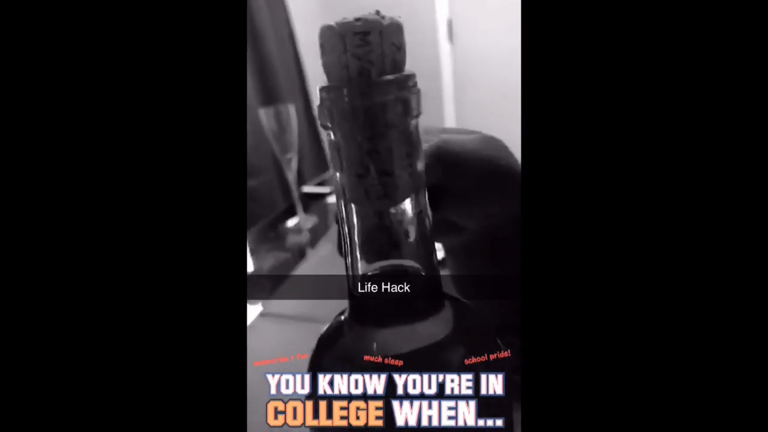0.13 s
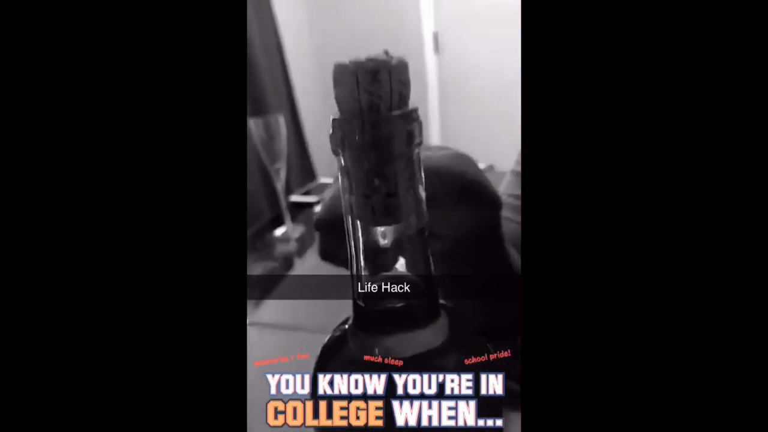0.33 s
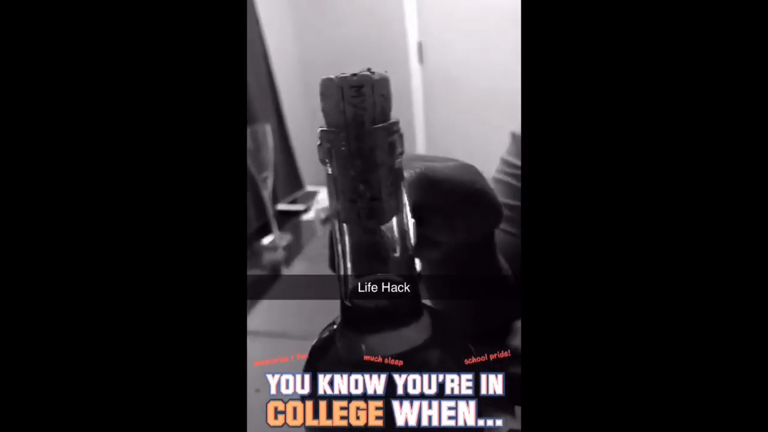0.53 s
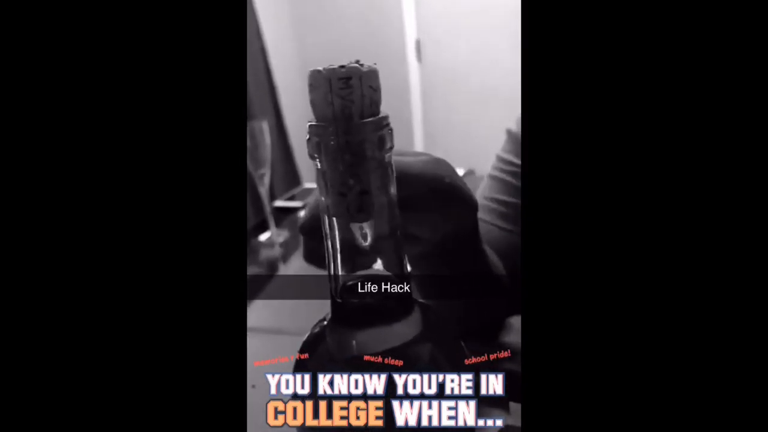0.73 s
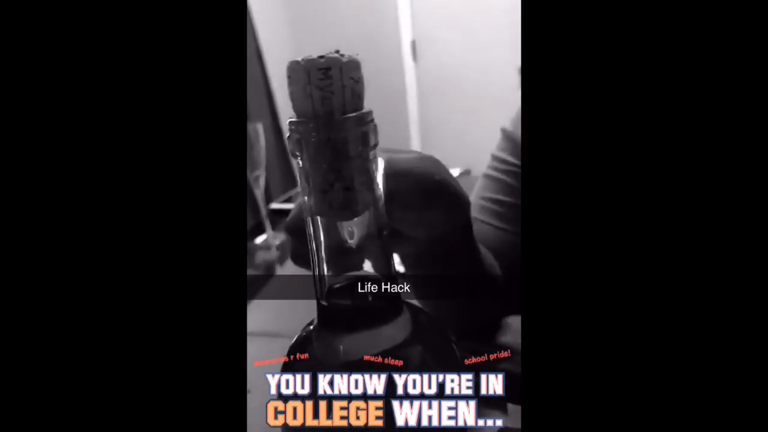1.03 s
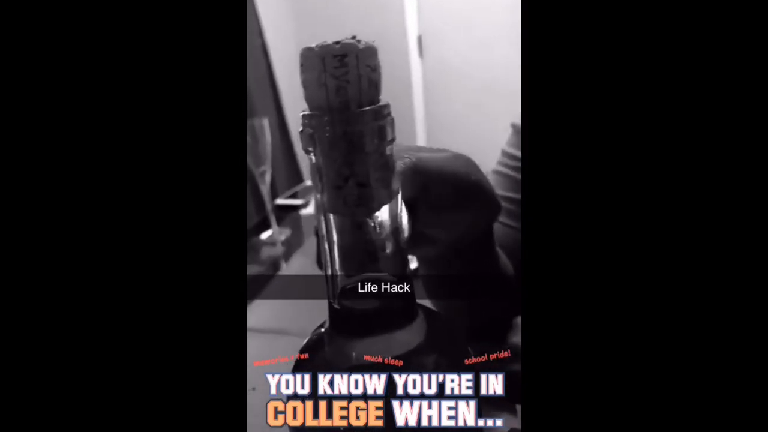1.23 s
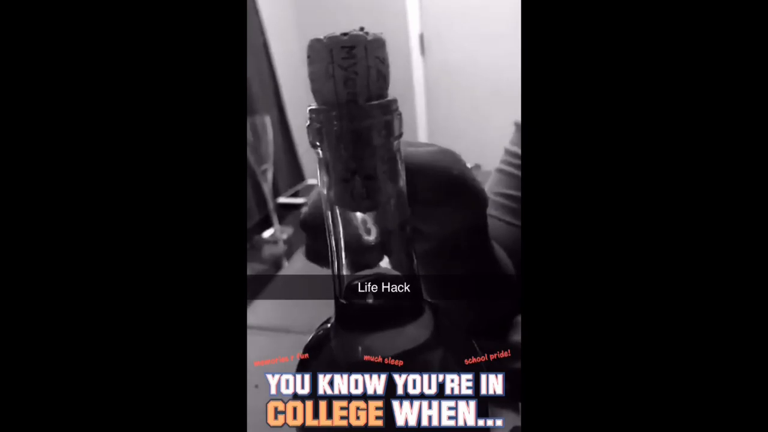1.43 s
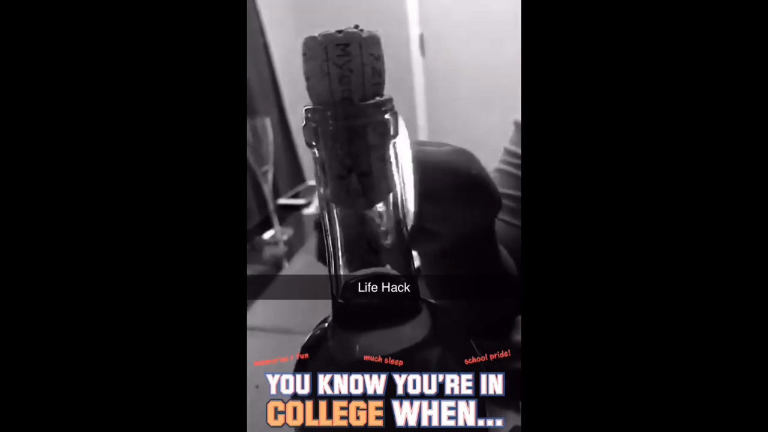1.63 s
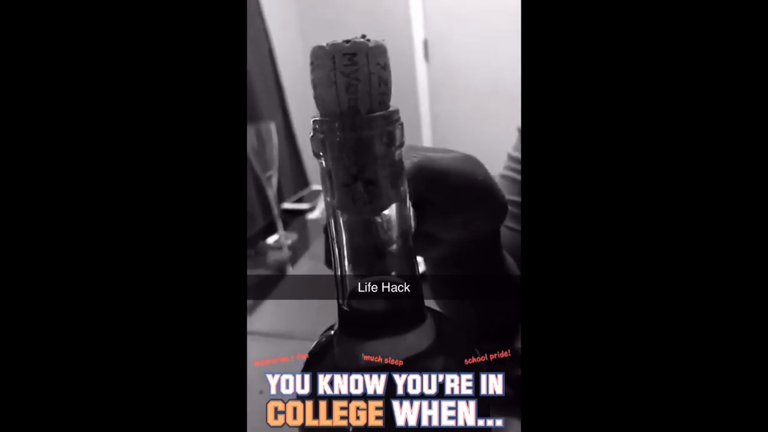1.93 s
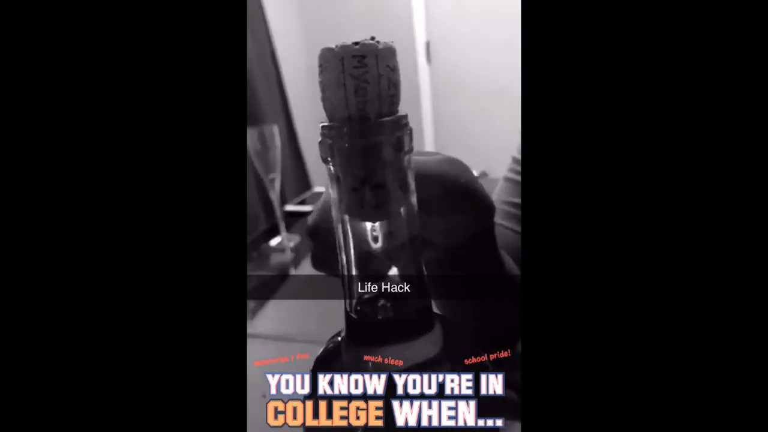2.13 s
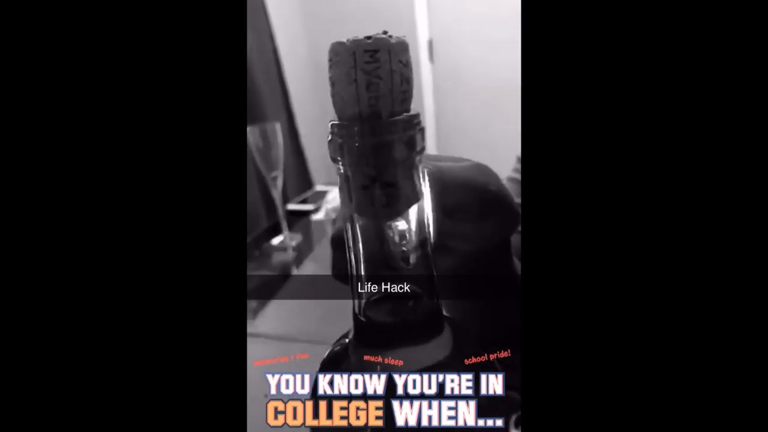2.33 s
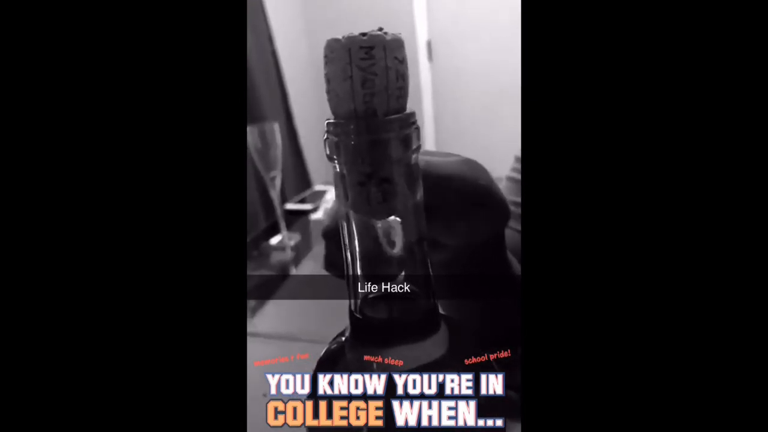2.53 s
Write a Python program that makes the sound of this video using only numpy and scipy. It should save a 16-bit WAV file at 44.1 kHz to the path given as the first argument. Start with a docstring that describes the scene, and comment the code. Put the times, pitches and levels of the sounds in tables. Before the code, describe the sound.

A flint lighter is struck twice, close up in a quiet room. Small ticks and soft rustles come at 0.05-0.3 s, fainter ones near 0.67 s. At 1.57 s a bright gritty snap lands amid clicks, with a faint wooden creak from 1.5 to 1.9 s. Clicks and a dull knock follow around 2.1-2.2 s, then a second rasp and low thump at 2.48 s. Low motor hum and airy hiss continue throughout.

```python
"""Two close, gritty strikes of a flint lighter in a quiet room, with ticks, soft hisses, low thumps and a faint wooden creak.
Beneath them lie a low motor hum, a wavering drone, a thin whine and airy hiss.
Each strike is random grit, coloured and ringing the casing; ticks and snaps pair a noise crack with a ring, and
rustles are banded noise. Thumps and thin lingering rings are dying sines, the creak is a train of slips ringing
hollow notes, the motor is sines, and the air is shaped noise. Strikes and ticks also excite a short room tail."""
import sys
import numpy as np
from scipy import signal
from scipy.fft import rfft, irfft
from scipy.io import wavfile
from scipy.ndimage import uniform_filter1d

SR = 44100
rng = np.random.default_rng(int(sys.argv[2]) if len(sys.argv) > 2 else 0)


def pcm_store(signal):
    """Save signal as 16-bit PCM."""
    levels = np.round(np.clip(np.atleast_2d(signal), -1, 1) * 32767)
    wavfile.write(sys.argv[1], SR, levels.astype(np.int16).T)


N = 118188  # length in samples

# Motor hum over time. Each row: time in seconds, RMS levels of shaft orders 1, 2 and 3 in dB.
MOTOR_ORDERS = [(0.0, -43, -58, -46.5), (0.07, -41.5, -45, -73), (0.16, -41, -49.5, -71),
                (0.42, -40.5, -49, -48.5), (0.63, -41.5, -49.5, -51.5), (0.84, -43.5, -44.5, -63),
                (0.93, -44, -50.5, -55), (1.23, -56.5, -45, -48.5), (1.32, -49.5, -51, -68),
                (1.5, -45, -48.5, -46), (1.72, -44, -44, -62.5), (1.81, -41, -47, -50),
                (2.19, -41, -47, -58), (2.24, -39, -42.5, -49.5), (2.42, -46, -44.5, -57),
                (2.48, -39.5, -58, -46), (2.58, -42.5, -47.5, -62), (2.68, -50.5, -46.5, -44)]
# Drone swells. Each row: time in seconds, RMS level in dB before the waver.
DRONE_LEVELS = [(0, -65), (.24, -58.5), (.5, -69), (.7, -57), (1.1, -61.5), (1.25, -62), (1.65, -64.5),
                (1.8, -79), (2.68, -59.5)]
# Tonal balance of the room air. Each row: frequency in Hz, relative density in dB per Hz.
AIR_COLOUR = [(12, -26), (20, -5), (59, -4), (103, -15), (157, -7), (324, -17), (405, -21.5), (466, -25),
              (633, -28), (1200, -33.5), (1340, -35.5), (2100, -38.5), (3180, -37.5), (3760, -44),
              (8210, -47.5), (12800, -49), (15600, -60)]
# Resonant lifts in the air. Each row: centre in Hz, width in Hz, lift in dB.
AIR_LIFTS = [(543.6, 15.4, 6), (1333, 50, 7), (2460, 600, 4), (3220, 26, 10.5), (5230, 150, 8),
             (8150, 160, 6.5)]
# Soft hisses and rustles. Each row: start in seconds, length in seconds, RMS level in dB before the swell,
# centre in Hz, width in Hz.
RUSTLES = [(0, 0.26, -70, 7000, 7000), (0.027, 0.051, -62, 6160, 3500), (0.046, 0.43, -68.5, 2470, 1000),
           (0.121, 0.064, -67, 6500, 5000), (0.135, 0.052, -62.5, 12400, 3000),
           (0.252, 0.19, -63, 2330, 596), (0.585, 0.041, -73, 4730, 1500), (.63, 0.069, -65, 6460, 4000),
           (0.634, 0.072, -68.5, 12000, 2500), (0.747, 0.15, -72, 11700, 2500),
           (0.768, 0.12, -69.5, 7100, 3000), (0.955, 0.07, -67, 6030, 7000),
           (0.966, 0.06, -64.5, 12200, 3000), (1.193, 0.4, -69.5, 1430, 540),
           (1.205, 0.56, -64, 6750, 5100), (1.323, 0.37, -69, 11400, 4000),
           (1.598, 0.12, -58.5, 5950, 8000), (1.797, 0.033, -70, 11970, 4000), (1.836, .3, -66, 5640, 3704),
           (1.847, 0.26, -62.5, 2800, 1880), (1.856, 0.22, -73, 11800, 4970), (2.143, 0.1, -63, 5200, 5000),
           (2.134, 0.091, -63, 3220, 900)]
# Ticks and sharp snaps, some within the first strike's catch. Each row: start in seconds,
# level in dB before halving, ring pitch in Hz, ring level against the crack in dB, t60 in seconds, crack centre in Hz.
TICKS = [(0.0547, -39.5, 6440, -1, 0.023, 3530), (0.2514, -41, 5700, -6, 0.016, 7000),
         (.331, -65, 2220, 3, 0.014, 2200), (.154, -44, 6800, 2, 0.016, 9000),
         (0.667, -54, 6240, 6.5, 0.051, 6000), (0.673, -53, 5600, 1, .015, 5000),
         (1.513, -42, 2790, 1.5, 0.011, 2940), (1.552, -40, 7200, 1, .03, 7000),
         (1.5596, -33.5, 2930, 8.5, 0.011, 3000), (1.5655, -31, 7300, 10, 0.016, 8000),
         (1.571, -37, 1390, 7, 0.022, 2000), (1.5727, -21.5, 6180, 8, 0.013, 6980),
         (1.5756, -27, 7500, 15.5, 0.02, 8000), (1.578, -36, 2960, -5, 0.011, 3000),
         (1.608, -38, 6250, 2, 0.04, 6000), (1.82, -40, 5280, -2, 0.013, 5930),
         (1.867, -41, 13700, -12, 0.022, 10900), (2.124, -35.5, 2650, 4, 0.025, 4000),
         (2.128, -33.5, 2790, 9.5, 0.019, 3500), (2.166, -52, 2720, 12, .03, 3000),
         (2.168, -45, 1700, 12.5, 0.012, 2500), (2.192, -43, 6000, -8, .01, 8000),
         (2.212, -47, 10100, -4, .01, 8000)]
# Room decay. Each row: frequency in Hz, t60 in seconds.
ROOM_DECAY = [(1000, 0.22), (3000, 0.42), (7000, 0.26), (14000, 0.18)]
# Soft knocks and lingering rings: low thumps, and thin high rings around the ticks and second strike.
# Each row: start in seconds, level in dB before the soft onset, pitch in Hz, t60 in seconds.
KNOCKS_AND_RINGS = [(.055, -51, 1610, 0.036), (.08, -50, 2050, 0.037), (.083, -54, 1000, .04),
                    (2.2026, -27.5, 237, 0.025), (2.2107, -37.5, 154, 0.087), (2.212, -43, 277, 0.17),
                    (2.221, -46, 130, 0.092), (2.238, -36, 65, 0.079), (2.453, -49.5, 638, 0.13),
                    (2.468, -44.5, 650, 0.064), (2.474, -47, 1480, 0.063), (2.477, -53.5, 1250, 0.48),
                    (2.478, -53, 3250, 0.36), (2.477, -39, 240, 0.076), (2.4847, -29, 110, 0.038),
                    (2.493, -29, 56, 0.13)]
# Stick-slip motion of the wood. Each row: time in seconds, slips per second, slip level in dB.
CREAK_SLIPS = [(1.49, 68, -59), (1.525, 60, -52.5), (1.56, 66, -46.5), (1.599, 87, -51), (1.63, 86, -50),
               (1.67, 119, -50.5), (1.686, 87, -58), (1.695, 56.6, -72), (1.711, 86, -48.5),
               (1.74, 80, -53.5), (1.77, 63, -57), (1.83, 63, -58), (1.871, 68, -56)]
# Hollow notes of each slip. Each row: pitch in Hz, added level in dB, t60 in seconds.
CREAK_NOTES = [(775, 7.5, 0.018), (895, 4.5, 0.013), (605, 3, 0.019)]
# Flint strikes. Each row: catch time in seconds, grind level in dB, build-up in dB per second,
# casing ring in dB, catch in dB, catch rise in seconds, catch fall in seconds, run-out in dB per second.
# The ring and the catch are set against the grind.
STRIKES = [(1.574, -32, 430, -19.5, 2.5, 0.0017, 0.0059, 694),
           (2.4756, -31, 647, -22, 5, 0.006, 0.0017, 900)]
# Scrape colour, one list for each strike. Each row: frequency in Hz, relative level in dB per Hz.
SCRAPE_COLOURS = [
    [(530, -54), (900, -33), (1180, -21), (1380, -8), (1580, -20), (2830, -9.5), (4670, -14), (5200, -12),
     (6290, 0), (6840, -6), (7350, 0.5), (8890, -1), (10000, -20.5), (12900, -1.5), (15600, -26)],
    [(560, -38), (820, -60), (950, -24), (1120, -11), (1350, -11), (1480, -3.5), (1770, -12.5),
     (2480, -11.5), (2740, 1.5), (3000, -3.5), (3260, 1), (3780, -17), (4400, -1), (4780, -5.5), (8000, -2),
     (9760, -10.5), (12800, -4), (14900, -8), (15600, -34)],
]
# Casing modes. Each row: pitch in Hz, relative level in dB, t60 in seconds.
CASING_MODES = [(1370, -26, .03), (2810, 4, 0.036), (3400, 5, 0.16), (4340, -8, 0.018), (5500, 15, 0.019),
                (6460, -3, .015), (7150, -7, 0.02097), (8720, 18, 0.016), (13000, -10, .01)]

MOTOR_HZ, MOTOR_TROUGH_S = 28.25, .0136  # all three orders are at their trough at this time
DRONE_HZ, WHINE_HZ, WHINE_DB, WAVER_DB = 149.2, 408.8, -67.5, 2.5
AIR_DB, PATCH_DB, SWELL_DB = -48.5, 1.1, .5
RUSTLE_GRAIN_DB = 2.2
CRACK_WIDTH_HZ, SNAP_S = 11600, 0.0007
STRIKE_ROOM_DB, TICK_ROOM_DB = -14, -22
SLIP_JITTER, SLIP_SPREAD_DB = 0.19, 1.5  # jitter is a share of the slip rate
GRIT_PER_S, GRIT_DB = 13000, 2.9
ROLL_S, EASE_S, GRIND_COLOUR = .03, .013, .4  # the grind takes this share of the scrape colour in dB
EDGE_HZ = 15580


def amp(db):
    """Decibels to linear gain."""
    return 10 ** (np.asarray(db) / 20)


def evened(x):
    """Scale x to unit RMS."""
    return x / np.sqrt(np.mean(x ** 2) + 1e-20)


def read(points, hz):
    """Read a curve along a logarithmic frequency scale."""
    f, value = np.transpose(points)
    return np.interp(np.log(hz + 1), np.log(f + 1), value)


def add(mix, s, sound):
    """Lay a sound into the mix at s seconds, cutting it at the end."""
    part = mix[round(s * SR):][:len(sound)]
    part += sound[:len(part)]


def drift(t, top_hz):
    """Slow wander of unit RMS: sines of random phase, stronger towards the slow end."""
    rates = np.geomspace(top_hz / 20, top_hz, 20)
    return evened(sum(np.sin(2 * np.pi * (f * t + rng.random())) / np.sqrt(f) for f in rates))


def ring(hz, db, t60):
    """One mode dying by 60 dB, then cut."""
    t = np.arange(round(t60 * SR)) / SR
    return amp(db - 60 * t / t60) * np.sin(2 * np.pi * hz * t)


def band(x, hz, width_hz):
    """A bell-shaped frequency band of x."""
    f = np.fft.rfftfreq(len(x), 1 / SR)
    return irfft(rfft(x) * np.exp(-2 * ((f - hz) / width_hz) ** 2), len(x))


def motor():
    """Three shaft orders rise and fall as the motor turns, with a wavering drone and a thin whine."""
    t = np.arange(N) / SR
    times, *order_levels = np.transpose(MOTOR_ORDERS)
    turn = 2 * np.pi * MOTOR_HZ * (t - MOTOR_TROUGH_S)
    hum = sum(amp(np.interp(t, times, db)) * np.cos(k * turn + np.pi) for k, db in enumerate(order_levels, 1))
    drone_db = np.interp(t, *np.transpose(DRONE_LEVELS)) + WAVER_DB * drift(t, 6.4)
    drone = amp(drone_db) * np.sin(2 * np.pi * DRONE_HZ * t)
    whine_gain = amp(WHINE_DB + WAVER_DB * drift(t, 8.2))
    whine = whine_gain * np.sin(2 * np.pi * WHINE_HZ * t + 0.36 * drift(t, 6))
    return np.sqrt(2) * (hum + drone + whine)  # root two turns RMS levels into sine peaks


def air():
    """Room rumble and hiss: noise shaped in frequency, with faint drifting patches and a slow swell."""
    frames, hz = N // 512 + 5, np.fft.rfftfreq(2048, 1 / SR)
    real, imaginary, patches = rng.standard_normal((frames, 1025, 3)).T
    patches = uniform_filter1d(patches, size=40, axis=0)  # blur across frequency
    patches = evened(uniform_filter1d(patches, size=6, axis=1))  # blur across time
    lift_db = sum(db * np.exp(-2 * ((hz - f) / w) ** 2) for f, w, db in AIR_LIFTS)
    colour_db = (read(AIR_COLOUR, hz) + lift_db)[:, None]
    swell_db = SWELL_DB * drift(np.arange(frames) * 512 / SR, 3.24)
    spectrum = (real + 1j * imaginary) * amp(colour_db + PATCH_DB * patches + swell_db)
    hiss = signal.istft(spectrum, nperseg=2048, noverlap=1536)[1][:N]
    return amp(AIR_DB) * evened(hiss)


def rustle(s, length, db, hz, width_hz):
    """A soft hiss or rustle: a band of uneven noise that swells and fades."""
    n = round(length * SR)
    noise = rng.standard_normal(n)
    grain_db = RUSTLE_GRAIN_DB * evened(uniform_filter1d(rng.standard_normal(n), size=90))
    swell = np.sin(np.pi * np.arange(n) / n)
    return s, amp(db) * evened(band(noise * amp(grain_db), hz, width_hz)) * swell


def tick(s, db, hz, ring_db, t60, crack_hz):
    """A tick or sharp snap: a broad noise crack and one short ring of rough pitch."""
    t = np.arange(2048) / SR
    wobble, noise = rng.standard_normal((2048, 2)).T
    roughness = 0.084 * evened(uniform_filter1d(wobble, size=60))
    body = amp(ring_db) * np.sin(2 * np.pi * hz * t + roughness)
    bright = noise - uniform_filter1d(noise, size=15)
    # The crack dies faster than the ring.
    crack = evened(band(bright, crack_hz, CRACK_WIDTH_HZ)) * amp(-30 * t / t60)
    envelope = amp(db - 60 * t / t60) / 2 * np.minimum(t / SNAP_S, 1)
    return s, envelope * (body + crack)


def room(x):
    """Sparse reflections of random sign, with each frequency band dying at its own speed."""
    taps = np.zeros(SR // 2)
    at = np.arange(200, len(taps) - 20, 20)
    taps[at + rng.integers(0, 20, len(at))] = rng.choice([-1., 1.], len(at))
    hz, t, spectrum = signal.stft(taps, SR, nperseg=256)
    decay = amp(-60 * t / read(ROOM_DECAY, hz)[:, None])
    tail = signal.istft(spectrum * decay, SR, nperseg=256)[1]
    return signal.fftconvolve(x, tail / np.linalg.norm(tail))[:N]


def knock_or_ring(s, db, hz, t60):
    """A low thump or a thin lingering ring: one dying sine with a soft onset."""
    push = -ring(hz, db, t60)
    return s, push * np.minimum(np.arange(len(push)) / (0.0033 * SR), 1)


def creak():
    """Something wooden sticks and slips under a shifting weight; each slip rings a few hollow notes."""
    times, rate, level_db = np.transpose(CREAK_SLIPS)
    t = np.arange(times[0], times[-1], 1 / SR)
    wander, spread = rng.standard_normal((len(t), 2)).T
    jitter = 1 + SLIP_JITTER * evened(uniform_filter1d(wander, size=400))
    turns = np.cumsum(np.interp(t, times, rate) * jitter) / SR
    # Each whole turn of the running count lets go one slip.
    slips = np.diff(np.floor(turns), prepend=0)
    slips = slips * amp(np.interp(t, times, level_db) + SLIP_SPREAD_DB * spread)
    note = np.zeros(SR // 20)
    for mode in CREAK_NOTES:
        add(note, 0, ring(*mode))
    onset = np.minimum(np.arange(len(note)) / (0.0019 * SR), 1)
    return times[0], np.convolve(slips, note * onset)


def strike(catch_s, db, build_db_per_s, body_db, catch_db, rise_s, fall_s, runout_db_per_s, colour):
    """The wheel grinds ever harder on the flint, catches with a crack, runs out; the grit rings the casing."""
    t = np.arange(-ROLL_S, .08, 1 / SR)  # the catch is at zero
    hits = rng.random(len(t)) < GRIT_PER_S / SR
    sizes = amp(GRIT_DB * np.minimum(rng.exponential(1, len(t)), 4))
    grit = hits * sizes * rng.choice([-1, 1], len(t))
    colour_db = read(colour, np.fft.rfftfreq(len(t), 1 / SR))
    grind = evened(irfft(rfft(grit) * amp(GRIND_COLOUR * colour_db), len(t)))
    crack = evened(irfft(rfft(grit) * amp(colour_db), len(t)))
    build = amp(build_db_per_s * t) * np.clip((t + ROLL_S) / EASE_S, 0, 1)
    force = np.where(t < 0, build, amp(-runout_db_per_s * t))
    catch = amp(catch_db) * np.exp(-abs(t) / np.where(t < 0, rise_s, fall_s))
    casing = np.zeros(SR // 10)
    for mode in CASING_MODES:
        add(casing, 0, ring(*mode))
    rung = signal.fftconvolve(evened(grit) * (force + catch), casing / np.linalg.norm(casing))[:len(t)]
    return catch_s - ROLL_S, amp(db) * (force * grind + catch * crack + amp(body_db) * rung)


def scene():
    """Strikes, ticks and snaps with their room tail, over rustles, creak, thumps, rings, motor and air."""
    lighter, snaps, soft = np.zeros((3, N))
    for row, colour in zip(STRIKES, SCRAPE_COLOURS):
        add(lighter, *strike(*row, colour))
    for row in TICKS:
        add(snaps, *tick(*row))
    for row in RUSTLES:
        add(soft, *rustle(*row))
    add(soft, *creak())
    for row in KNOCKS_AND_RINGS:
        add(soft, *knock_or_ring(*row))
    echo = room(amp(STRIKE_ROOM_DB) * lighter + amp(TICK_ROOM_DB) * snaps)
    return (lighter + snaps + echo + soft + motor() + air())[None]


def record(dry):
    """The phone's upper band limit: a steep low-pass filter."""
    lowpass = signal.firwin(511, EDGE_HZ, window=("kaiser", 9), fs=SR)
    return signal.oaconvolve(dry, lowpass[None], "same")


dry = scene()
out = record(dry)
pcm_store(out)
```